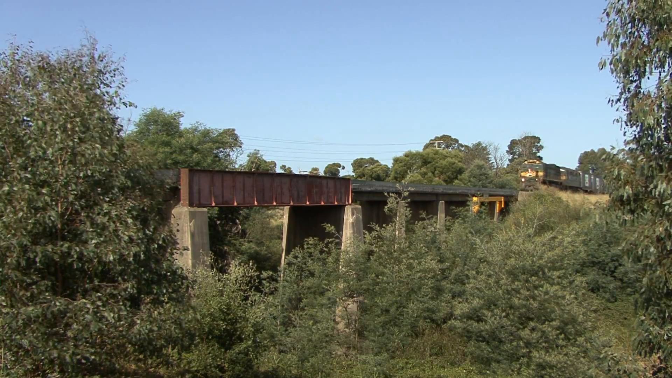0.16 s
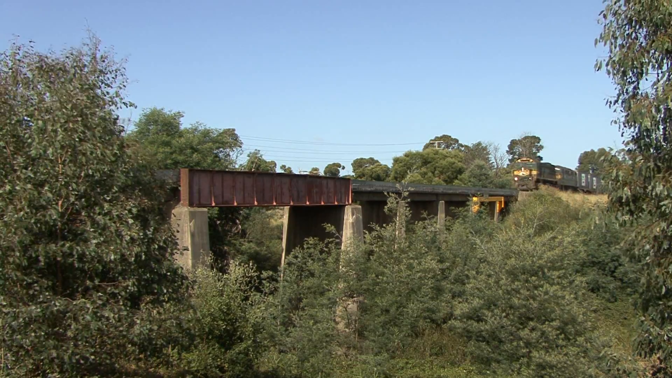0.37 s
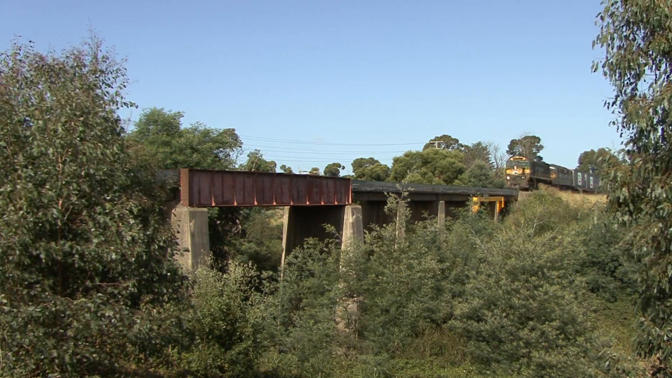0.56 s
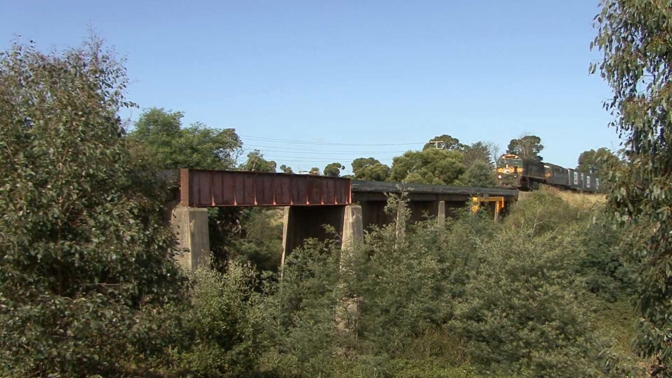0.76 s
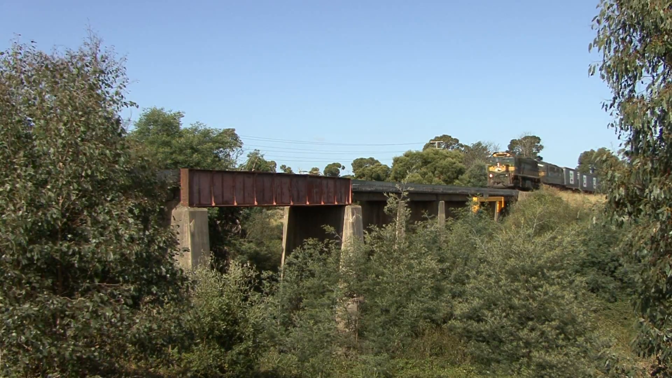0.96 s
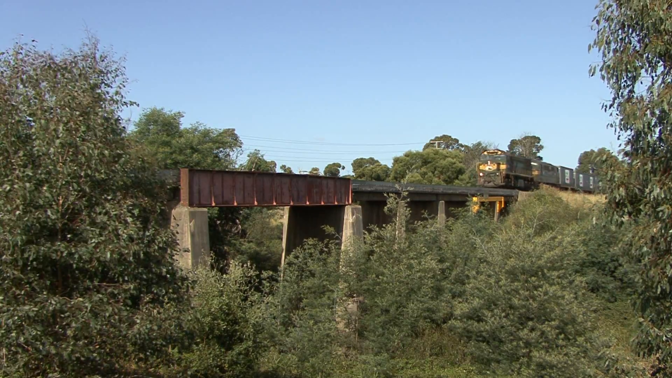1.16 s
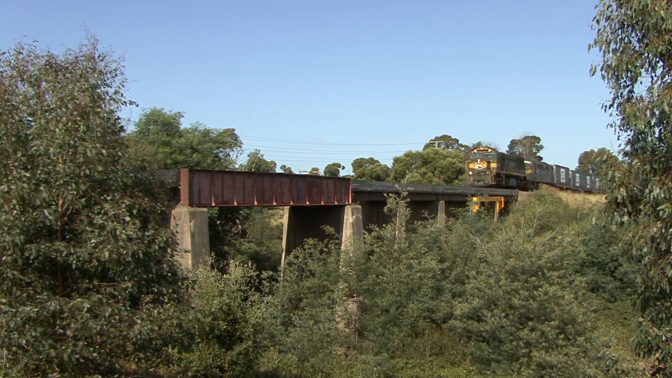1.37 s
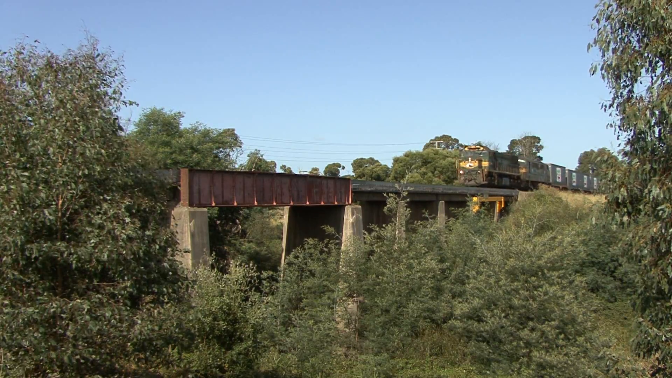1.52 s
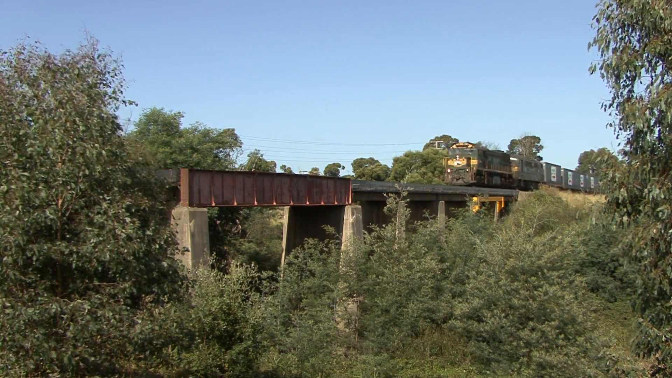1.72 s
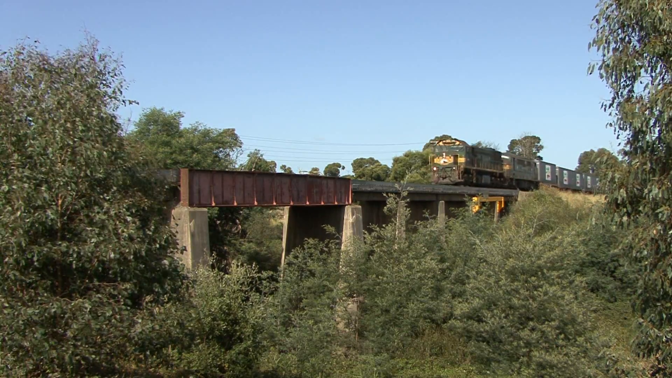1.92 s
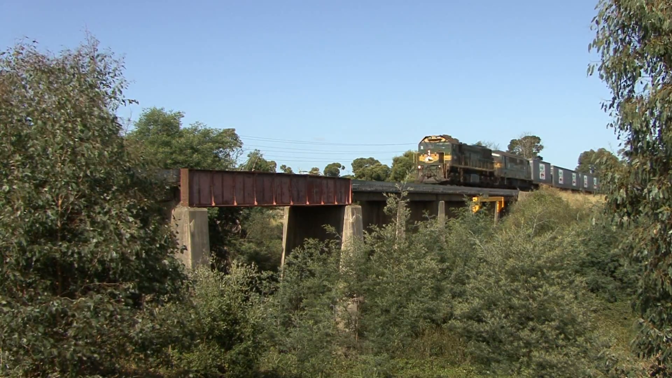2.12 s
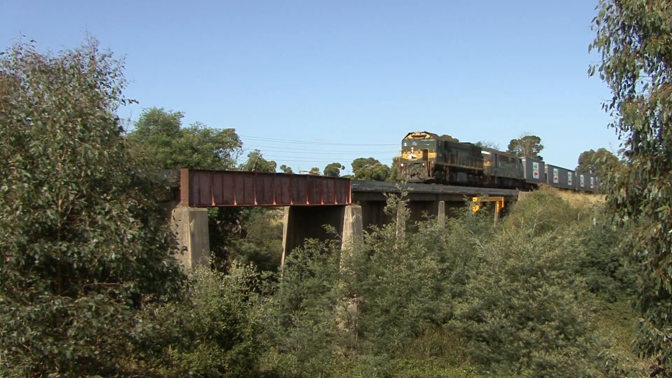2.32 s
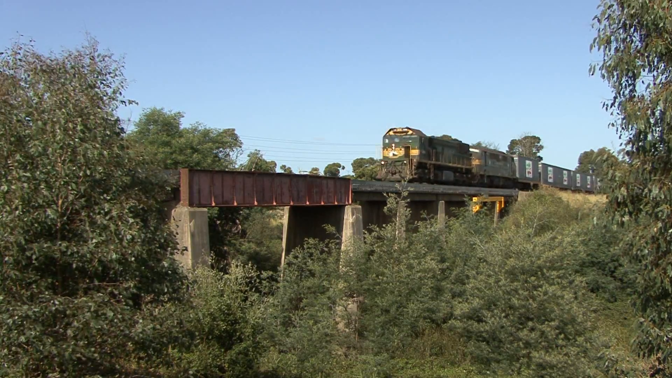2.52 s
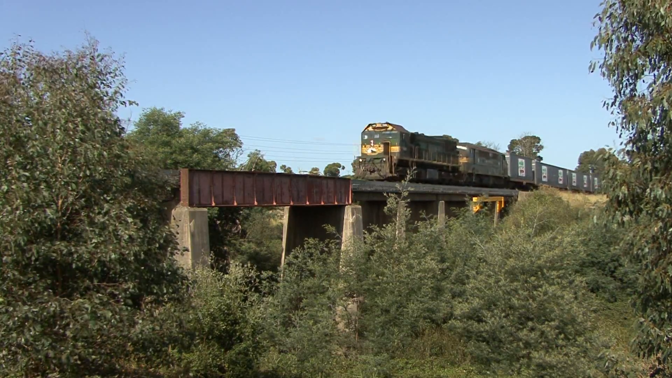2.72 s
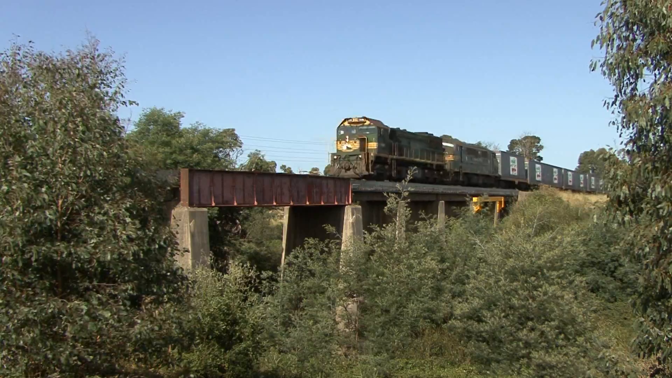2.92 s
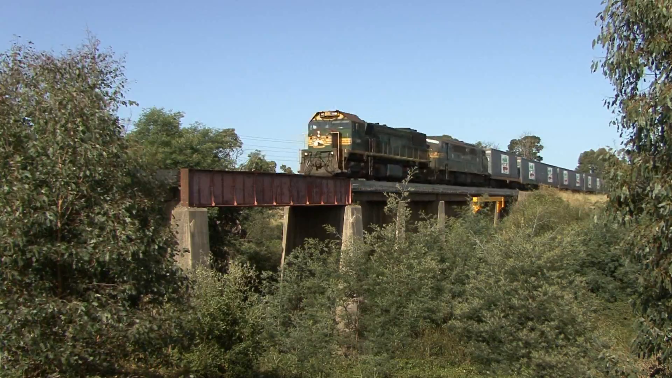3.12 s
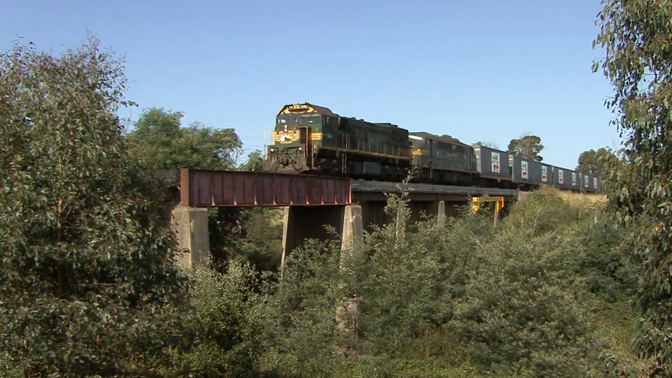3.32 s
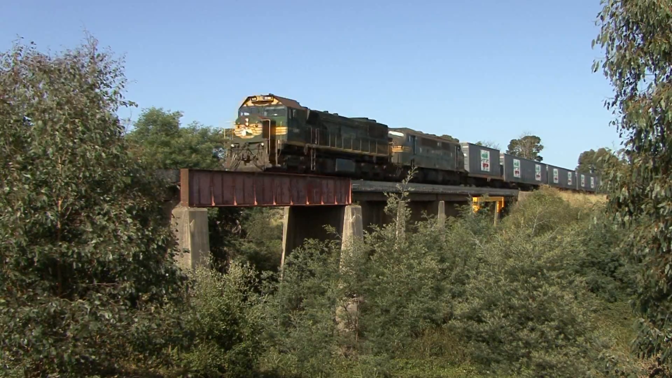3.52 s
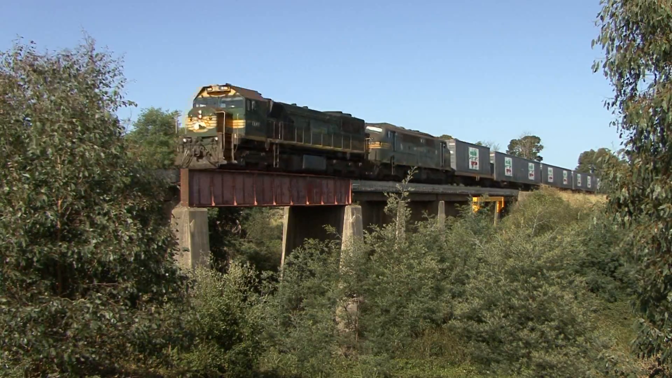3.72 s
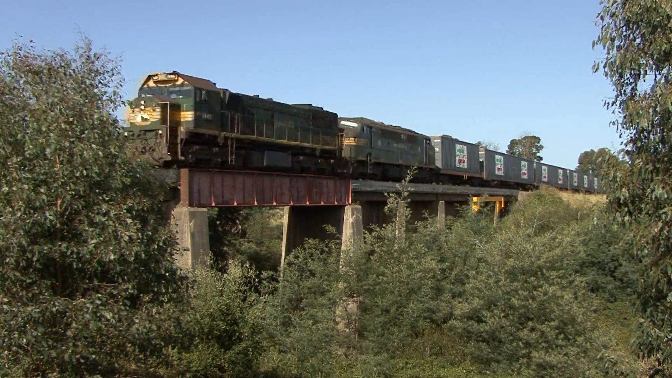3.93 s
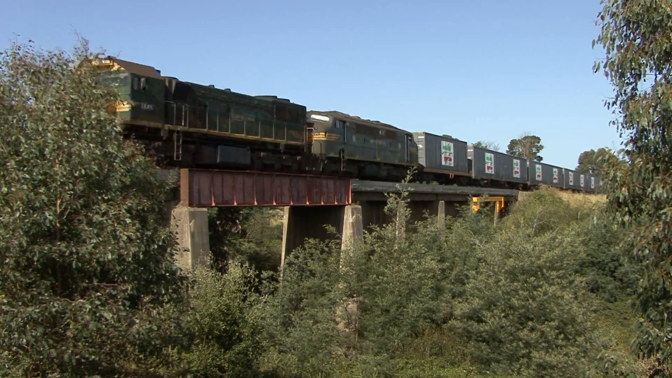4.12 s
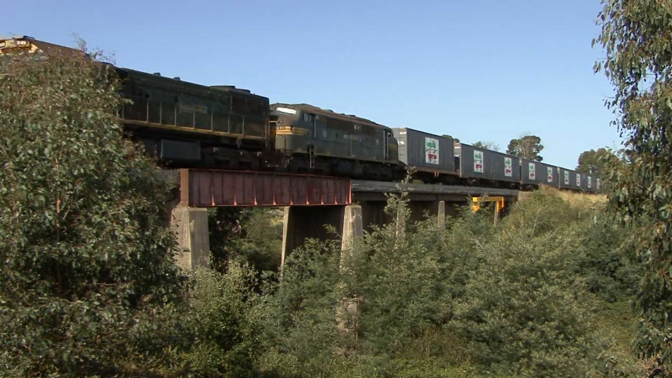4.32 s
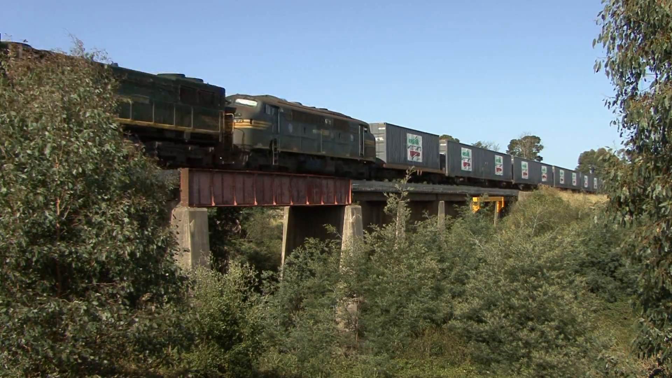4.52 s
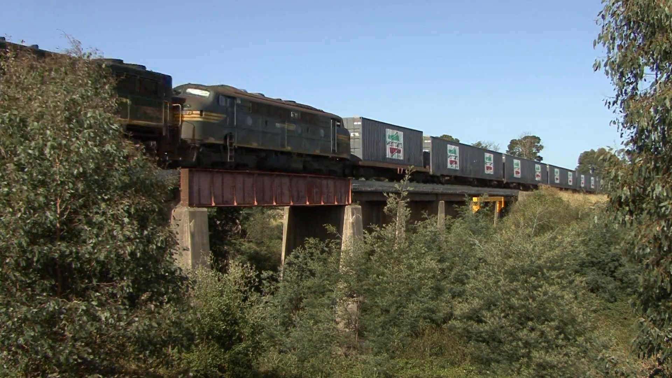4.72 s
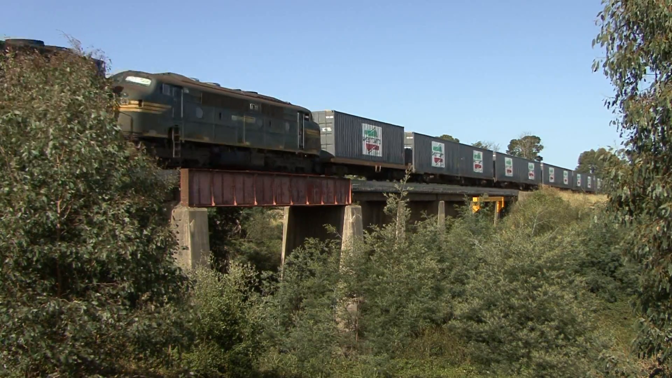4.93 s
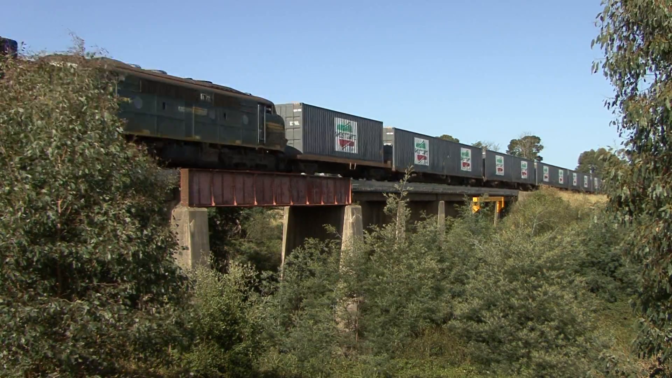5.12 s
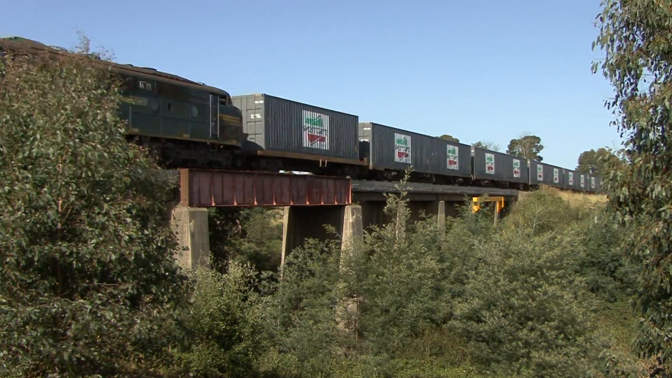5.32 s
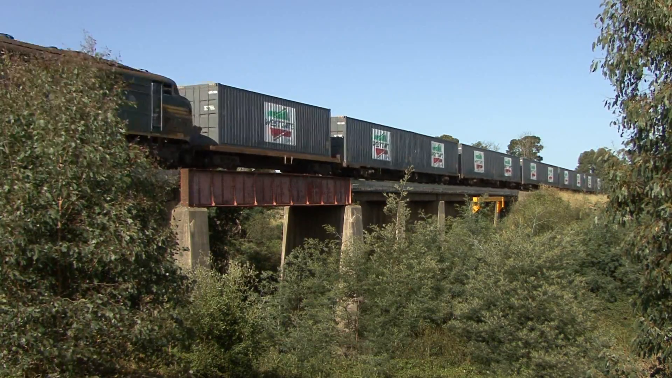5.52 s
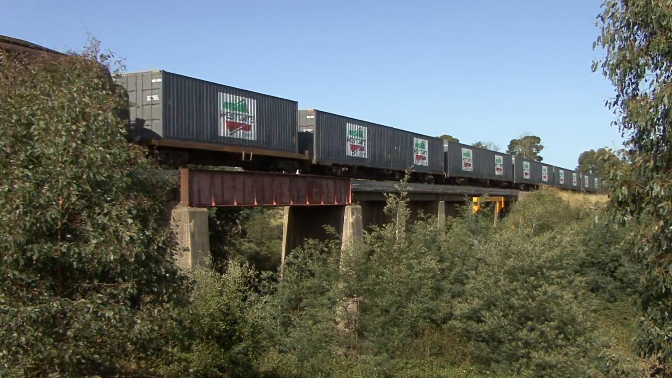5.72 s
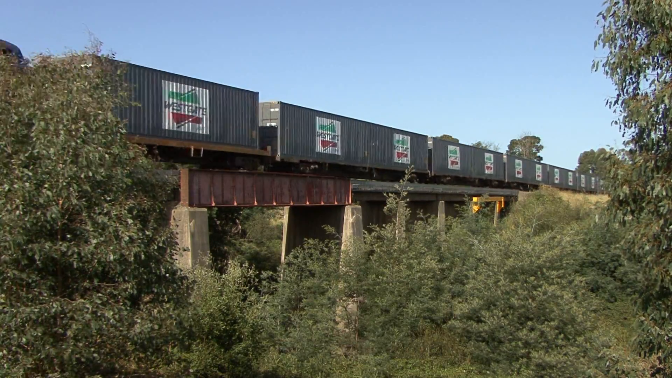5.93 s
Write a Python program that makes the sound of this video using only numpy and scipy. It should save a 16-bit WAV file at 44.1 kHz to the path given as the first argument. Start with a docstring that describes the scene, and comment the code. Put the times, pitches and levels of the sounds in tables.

```python
"""A diesel freight train comes up to a steel girder bridge and crosses it, heard from the scrub below. First
the tyre noise of a road vehicle fades away. From about 1 s the rail sings thinly ahead of the train, then the
deck booms under the rolling wheels and thuds at each rail joint, while an insect ticks nearby in pairs. Rail
roar and wheel hiss keep building; between 4 and 5 s the exhaust rumble of the locomotives peaks, and the deep
bass lurches in short bumps while the train is loudest."""
import sys
import numpy as np
from scipy import signal
from scipy.fft import rfft, irfft, next_fast_len
from scipy.io import wavfile
from scipy.ndimage import uniform_filter1d, map_coordinates

SR = 44100
rng = np.random.default_rng(int(sys.argv[2]) if len(sys.argv) > 2 else 0)


def transcribe(u):
    """Save the signal u as a 16-bit wav file named by the first command-line argument.

    u: samples, shape (n,) or (channels, n), limited to [-1, 1]; the rate is SR.
    q: integer samples, one column per channel.
    """
    v = np.clip(np.atleast_2d(u).T, -1, 1)
    q = np.round(v * 32767).astype(np.int16)
    wavfile.write(sys.argv[1], SR, q)


N = 263718

# The train drawing near: (time [s], wheel hiss level [dB], rail roar level [dB])
APPROACH = [(0, -45.5, -40.5), (.7, -46.5, -40.5), (1.1, -44, -36.5), (1.5, -40.5, -34), (2.1, -36.5, -28),
            (2.6, -36, -27), (3.3, -31.5, -25), (3.5, -30.5, -24), (3.9, -29.5, -25), (4.3, -27.5, -21.5),
            (4.7, -26.5, -20.5), (4.9, -25, -20.5), (5.1, -26.5, -21.5), (5.45, -26.5, -21),
            (5.98, -27, -21)]


def amp(db):
    """Gain of a level in dB."""
    return 10 ** (np.asarray(db) / 20)


def unit(x):
    """Scaled to rms 1."""
    return x / np.sqrt(np.mean(x ** 2) + 1e-20)


def curves(rows):
    """One automation curve for each column after the time."""
    times, *columns = np.transpose(rows)
    return [np.interp(np.arange(N) / SR, times, column) for column in columns]


def filtered(x, response):
    """x through an EQ given as gain against frequency."""
    size = next_fast_len(N + 8192)
    return irfft(rfft(x, size) * response(np.fft.rfftfreq(size, 1 / SR)), size)[:N]


def eq(table):
    """EQ curve through (frequency [Hz], gain [dB]) points on a log axis."""
    f, db = np.transpose(table)
    return lambda hz: amp(np.interp(np.log(hz + 1), np.log(f + 1), db))


def modes(table, low_hz, high_hz):
    """EQ of resonances (centre [Hz], width [Hz], level [dB]), falling steeply outside low..high."""
    def response(f):
        power = sum(amp(db) ** 2 * (f * width) ** 2 / ((hz * hz - f * f) ** 2 + (f * width) ** 2)
                    for hz, width, db in table)
        return np.sqrt(power / (1 + (low_hz / (f + 1)) ** 8) / (1 + (f / high_hz) ** 16))
    return response


def rush(response, patchy_db):
    """Coloured noise of rms 1, its gain mottled over time and frequency."""
    spectrum = signal.stft(rng.standard_normal(N), nperseg=512)[2]
    patches = uniform_filter1d(rng.standard_normal(spectrum.shape), size=8, axis=0)
    patches = unit(uniform_filter1d(patches, size=8, axis=1))
    noise = signal.istft(spectrum * amp(patchy_db * patches), nperseg=512)[1][:N]
    return unit(filtered(noise, response))


def steady(x, seconds):
    """Leveller: evens out swells slower than the given time, at rms 1."""
    power = np.abs(uniform_filter1d(x ** 2, size=int(seconds * SR)))
    return unit(x / np.sqrt(power + 0.063 * np.mean(x ** 2)))


def follow_train(nearest_db, slope):
    """Level in dB of a layer that gains `slope` dB for each dB of the approach."""
    near_db = curves(APPROACH)[0]
    return nearest_db + slope * (near_db - near_db.max())


def swells(rows):
    """Sum of bell-shaped boosts in dB that rise faster than they fall."""
    t = np.arange(N) / SR
    rise_over_fall = 0.36
    return sum(db * np.exp(-.5 * ((t - s) / (fall * np.where(t < s, rise_over_fall, 1))) ** 2)
               for s, db, fall in rows)


def insect():
    """An insect ticks in evenly paced pairs: very short, high clicks with a faint hissy tail."""
    # Lone ticks ahead of the pairs: (time [s], level [dB])
    stray_ticks = [(0.1131, -51), (0.7223, -51), (2.1331, -52)]
    first_s, every_s, gap_s, pair_db = 2.1455, .3346, .073, -43
    pairs = [(first_s + k * every_s + gap, pair_db) for k in range(5) for gap in (0, gap_s)]
    t = np.arange(SR // 50) / SR
    click = amp(-60 * t / .004) * np.sin(2 * np.pi * 11500 * t)
    ticks = np.zeros(N + len(t))
    for s, db in stray_ticks + pairs:
        tail = .2 * amp(-60 * t / .015) * rng.standard_normal(len(t))
        ticks[round(s * SR):][:len(t)] += amp(db + 9) * (click + tail)
    return filtered(ticks[:N], eq([(6000, -55), (9000, 4), (11500, -8), (14000, -2)]))


def road_vehicle():
    """Tyre noise dies away; its higher band holds a little longer before fading."""
    # Lower and higher tyre band, each: (centre [Hz], width [Hz], level [dB])
    tyre_bands = [(510, 130, -18), (735, 44, -7.5), (830, 100, -9)], [(914, 47, 8), (1018, 62, 10),
                  (1220, 180, -18), (1760, 790, -38)]
    # Colour of the wide tyre hiss: (frequency [Hz], gain [dB])
    hiss_eq = [(60, -50), (130, -11), (300, -17), (1000, -12.5), (1400, -9.5), (2200, -36), (4500, -28),
               (7000, -42), (14000, -50)]
    # Fade-outs of lower band, higher band and hiss: (level [dB], hold [s], fade [dB/s])
    fades = [(-22.5, 0.05, 45), (-28, 0.2, 56), (-33, .03, 45)]
    t = np.arange(N) / SR
    layers = [steady(rush(modes(band, 220, 2900), patchy_db=0.5), seconds=0.11) for band in tyre_bands]
    layers.append(rush(eq(hiss_eq), patchy_db=-2.5))
    return sum(amp(db - fade * np.clip(t - hold, 0, None)) * layer
               for (db, hold, fade), layer in zip(fades, layers))


def locomotives():
    """Diesel exhaust rumbles over its lowest firing orders, loudest as the two locomotives pass."""
    # Upper and lower exhaust humps, each: (centre [Hz], width [Hz], level [dB])
    humps = [(137, 42, 0), (213.6, 57, 5)], [(55.4, 15, -14), (102, 35, 26)]
    # The pass-by: (time [s], rumble level [dB], firing order level [dB])
    levels = [(.3, -44, -50), (1.1, -47, -52), (1.4, -39, -54), (1.8, -31.5, -44.5), (2.3, -30.5, -44),
              (2.6, -29, -38.5), (3.1, -29.5, -40.5), (3.7, -28, -34.5), (4.1, -28, -35),
              (4.25, -24, -32.5), (4.75, -22.5, -30), (4.95, -24.5, -30), (5.42, -28.5, -33),
              (5.6, -27, -27), (5.98, -28, -36)]
    rumble_db, firing_db = curves(levels)
    rumble = steady(rush(modes(humps[0], 106, 273), patchy_db=0.7), seconds=.22)
    firing = steady(rush(modes(humps[1], 47.7, 144), patchy_db=1.5), seconds=0.44)
    return amp(rumble_db) * rumble + amp(firing_db) * firing


def bass_lurches():
    """The deepest bass lurches while the train is loudest."""
    # Sub-bass bumps: (onset [s], level [dB])
    lurches = [(4.27, -28), (4.53, -36), (4.6, -37), (4.7, -23.5), (4.8, -32), (4.87, -32), (4.98, -25),
               (5.05, -27), (5.12, -34), (5.2, -36), (5.33, -28), (5.46, -32), (5.58, -34), (5.72, -43),
               (5.82, -47)]
    attack_s, fall_db_per_s = 0.018, 190
    sub_eq = eq([(1, -9), (8, -5.5), (22, -6), (40, -16), (90, -68)])
    sub = steady(rush(sub_eq, patchy_db=5), seconds=0.099)
    envelope = np.zeros(N)
    for s, db in lurches:
        age = np.clip(np.arange(N) / SR - s, 0, None)
        envelope = np.maximum(envelope, np.minimum(age / attack_s, 1) * amp(db - fall_db_per_s * age))
    return envelope * sub


def wheels():
    """Rough contact makes the wheels hiss; air takes the treble from them while the train is far."""
    # Lower and bright wheel modes, each: (centre [Hz], width [Hz], level [dB])
    rim_modes = [(1770, 560, -1), (2374, 500, -0.5), (2485, 56, -0.5), (3120, 730, -12.5), (3770, 880, -9),
                 (4280, 760, -12)], [(5960, 510, 0.5), (7980, 310, -13)]
    # Highest treble peaks: (centre [Hz], width [Hz], level [dB])
    treble_peaks = [(9620, 520, 2.5), (11400, 900, -1.5), (13300, 900, -13)]
    # Brief treble surges: (peak time [s], boost [dB], fall [s])
    surges = [(1.8, 1, 0.079), (2.18, 1.5, 0.041), (3.16, 4, .1), (4.07, 3, 0.093), (4.63, 8.5, 0.043),
              (4.79, 4.5, 0.098), (5.14, 5, .03), (5.19, 10.5, 0.026), (5.3, 5.5, .1), (5.55, -0.5, 0.032),
              (5.93, 1, 0.074)]
    grit = map_coordinates(rng.standard_normal(N // 300 + 4), [np.arange(N) / 300])  # contact roughness
    hiss = unit(amp(0.56 * grit) * rush(modes(rim_modes[0], 1290, 5430), patchy_db=0.71))
    bright = unit(amp(0.77 * grit) * rush(modes(rim_modes[1], 5100, 8500), patchy_db=1.2))
    top = unit(amp(1.1 * grit) * rush(modes(treble_peaks, 8500, 14000), patchy_db=1))
    surge_db = swells(surges)
    hiss_db = curves(APPROACH)[0] + 0.21 * surge_db
    bright_db = follow_train(-40.5, slope=1.05) + 0.87 * surge_db
    top_db = follow_train(-52, slope=1.5) + surge_db
    air_db = -75.5  # faint high hiss of the open air, a floor under the top band
    return amp(hiss_db) * hiss + amp(bright_db) * bright + np.hypot(amp(top_db), amp(air_db)) * top


def rails():
    """Rolling wheels set the rail modes roaring; a thin singing runs ahead of the train."""
    # Lower and upper rail modes, each: (centre [Hz], width [Hz], level [dB])
    rail_modes = [(444, 67, -1), (562, 95, 0.5), (681, 163, 1)], [(860, 90, 3.5), (980, 224, -2),
                  (1285, 245, -11)]
    # Singing of the rail: (time [s], level [dB])
    song_levels = [(.9, -66), (1.35, -46), (1.75, -50), (2.3, -51), (3.2, -47.5), (5.98, -44)]
    roar = amp(curves(APPROACH)[1]) * rush(modes(rail_modes[0], 400, 853), patchy_db=0.24)
    upper = amp(follow_train(-21.5, slope=0.88)) * rush(modes(rail_modes[1], 720, 1510), patchy_db=0.44)
    song = amp(curves(song_levels)[0]) * rush(modes([(2490, 140, 0)], 2100, 2900), patchy_db=0.5)
    return roar + upper + song


def joint_thuds(girder_modes):
    """Wheels strike rail joints: soft, short blows, each ringing the girders in a new balance."""
    # Blows at the joints: (time [s], level [dB])
    thuds = [(1.323, -17.5), (1.764, -7.5), (2.345, -6), (2.576, -3.5), (2.684, -3.5), (2.748, -6),
             (3.159, -12.5), (3.438, -4.5), (3.49, -16), (3.701, -8.5), (3.954, -3), (4.085, -7.5),
             (4.28, 1), (4.33, 4), (4.554, -4), (5.246, -0.5), (5.375, -7)]
    t = np.arange(SR // 5) / SR
    attack = 1 - np.exp(-t / 0.008)
    blows = np.zeros(N + len(t))
    for s, db in thuds:
        scatter_db = rng.normal(0, 2.2, len(girder_modes))
        ring = sum(amp(level + scatter) * np.exp(-np.pi * width * t) * np.sin(2 * np.pi * hz * t)
                   for (hz, width, level), scatter in zip(girder_modes, scatter_db))
        blows[round(s * SR):][:len(t)] += amp(db - 1) * attack * ring
    return filtered(blows[:N], eq([(60, -40), (180, -7), (600, -1), (1200, -19)]))


def bridge():
    """Many axles drive the steel at once: the deck booms, a girder plate sings, the joints thud."""
    # Main and lower girder modes, each: (centre [Hz], width [Hz], level [dB])
    girders = [(319, 30.2, 7.5), (402, 180, -14.5)], [(274, 29.6, 2)]
    # Boom of the deck: (time [s], main mode level [dB], lower mode level [dB])
    boom_levels = [(.5, -45, -43.5), (1.17, -38, -39), (1.42, -25.5, -35), (1.64, -25, -35),
                   (1.72, -30.5, -32.5), (1.98, -21.5, -28.5), (2.15, -27.5, -28), (2.26, -21, -21.5),
                   (2.65, -21.5, -26.5), (2.8, -18.5, -21.5), (3.2, -18.5, -25.5), (3.32, -28, -28),
                   (3.44, -18, -22.5), (3.72, -21.5, -23.5), (3.92, -18, -29), (4.12, -19.5, -20),
                   (4.3, -19.5, -18), (4.75, -19.5, -18.5), (5.1, -24.5, -23), (5.6, -25.5, -21.5),
                   (5.98, -22, -25)]
    # The plate sings out: (peak time [s], boost [dB], fall [s])
    plate_swells = [(3.66, 2, 0.069), (4.08, 2, .07), (5.07, 8, 0.073), (5.48, 5, 0.1), (5.88, 2.5, .08)]
    main_db, lower_db = curves(boom_levels)
    plate_db = follow_train(-20, slope=1.4) + swells(plate_swells)
    main = steady(rush(modes(girders[0], 260, 425), patchy_db=-1), seconds=0.099)
    lower = steady(rush(modes(girders[1], 200, 335), patchy_db=1.5), seconds=0.35)
    plate = steady(rush(modes([(389, 21, 0)], 295, 520), patchy_db=-1.5), seconds=0.16)
    boom = amp(main_db) * main + amp(lower_db) * lower
    return boom + amp(plate_db) * plate + joint_thuds(girders[0] + girders[1])


def scene():
    """All sources mixed in mono."""
    train = bridge() + locomotives() + bass_lurches() + rails() + wheels()
    return (train + road_vehicle() + insect())[None]


def record(dry):
    """A soft clip rounds off the highest peaks, then a brick-wall low-pass trims the top."""
    ceiling, cutoff_hz = .85, 14290
    soft = dry[0] / (1 + np.abs(dry[0] / ceiling) ** 4) ** (1 / 4)
    return filtered(soft, lambda hz: hz < cutoff_hz)[None]


dry = scene()
out = record(dry)
transcribe(out)
```